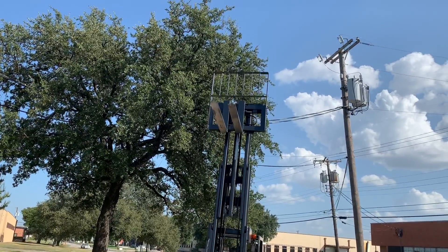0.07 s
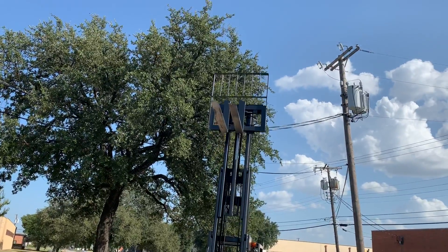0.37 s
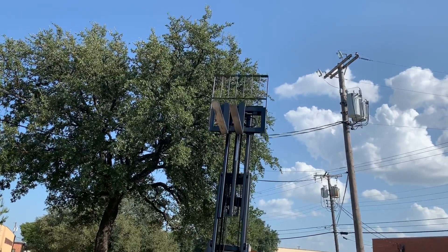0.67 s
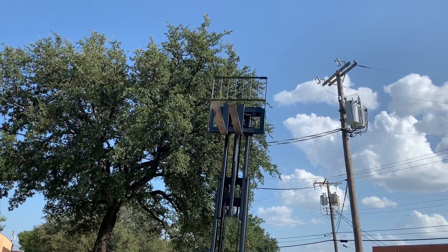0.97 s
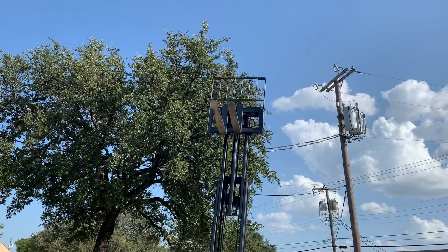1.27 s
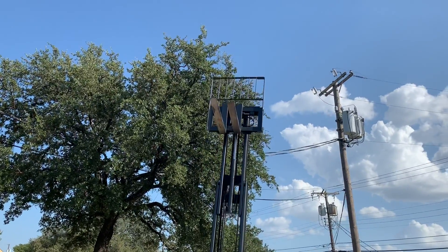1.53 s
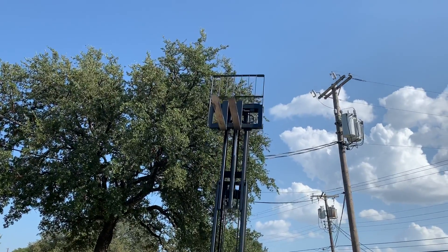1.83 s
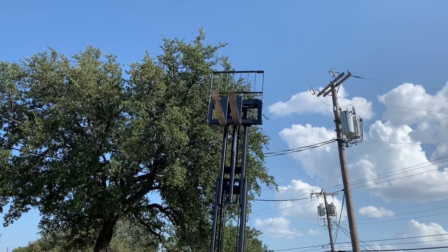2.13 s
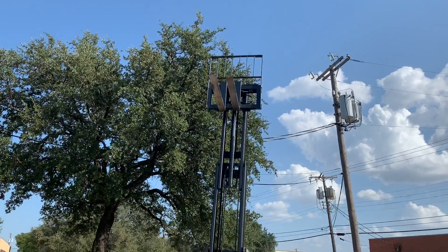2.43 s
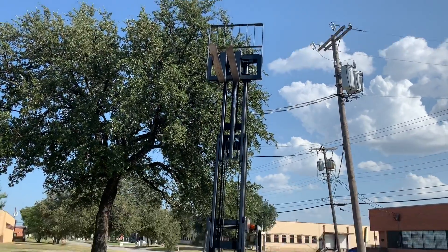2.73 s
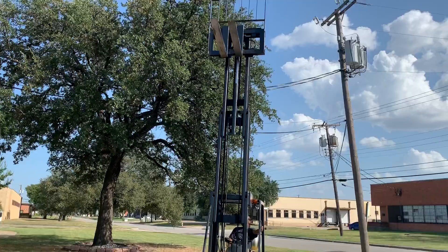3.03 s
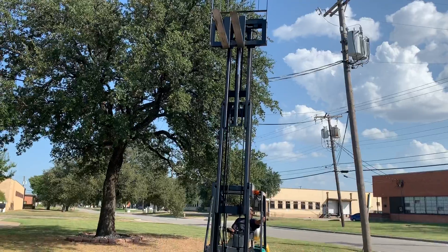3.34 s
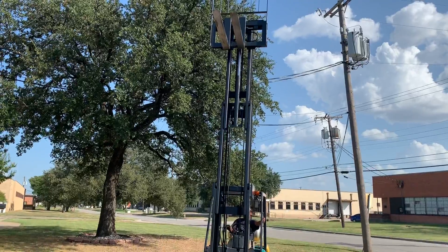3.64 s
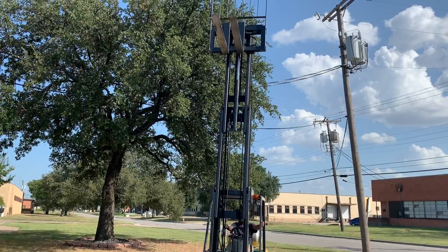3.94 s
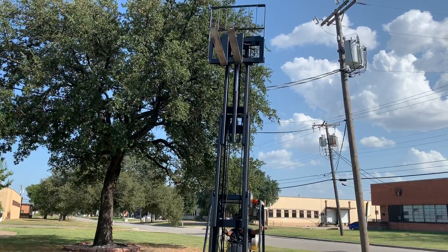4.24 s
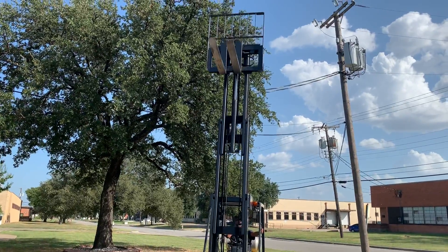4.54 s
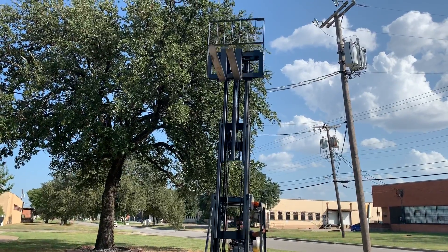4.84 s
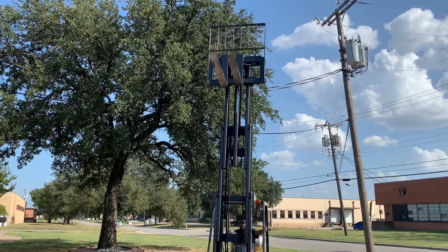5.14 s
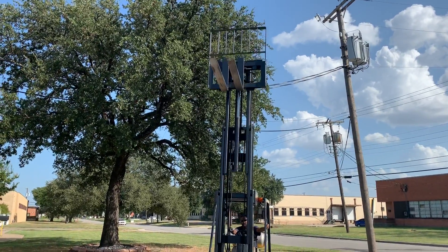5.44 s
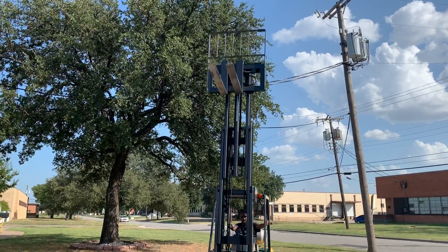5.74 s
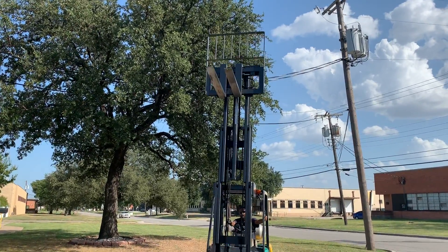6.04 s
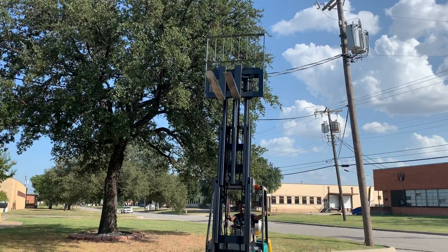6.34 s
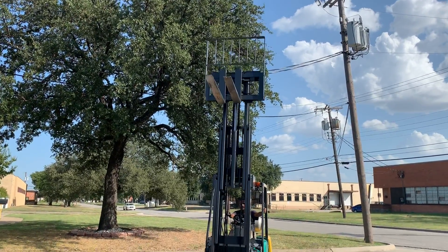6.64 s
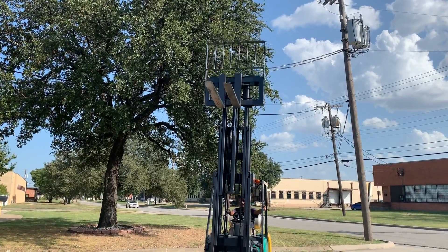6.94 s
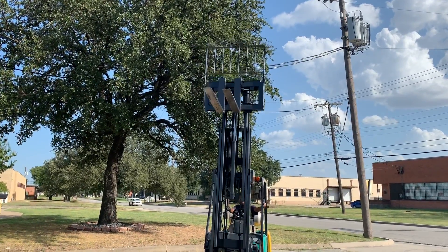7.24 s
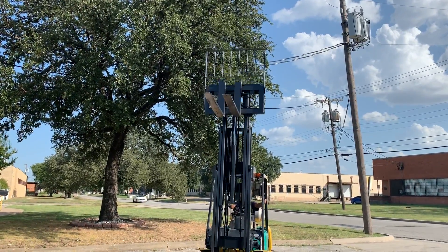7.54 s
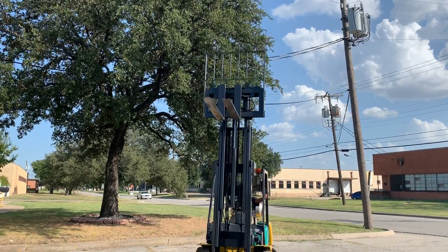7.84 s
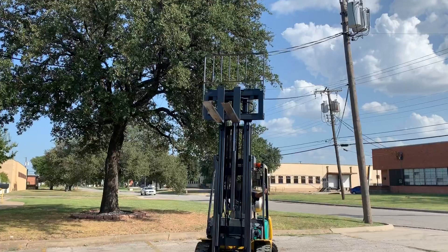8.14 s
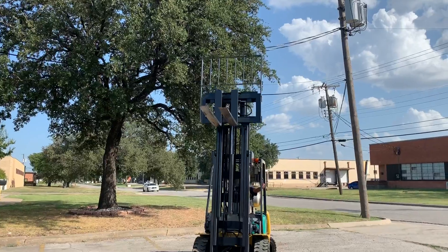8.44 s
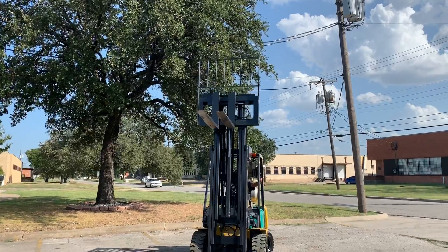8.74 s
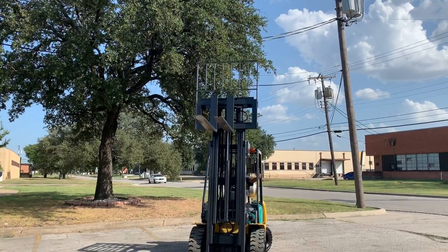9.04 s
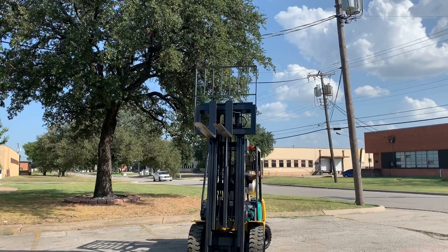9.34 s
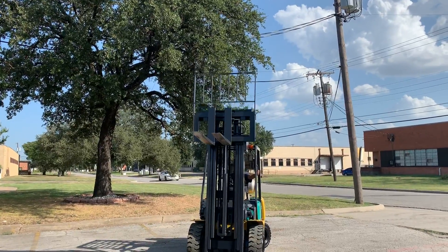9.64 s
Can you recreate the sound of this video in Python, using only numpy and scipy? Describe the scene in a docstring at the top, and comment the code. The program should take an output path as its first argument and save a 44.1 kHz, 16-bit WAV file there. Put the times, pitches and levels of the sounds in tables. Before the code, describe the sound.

The low, steady drone and lifting whine of a forklift are interrupted by a quick clatter of steel rails. The engine slows while the pump groans under load with a high whistle. After a short hiss of oil, the engine revs up and stays fast, its gears whining and the lowering cylinder ringing thinly. The place is outdoors with a faint echo from buildings, and late gusts rumble lightly on the microphone.

```python
"""A forklift's four-cylinder engine drones in a yard, with a steady whine as it lifts its carriage.
After two seconds the steel mast clatters at the top. The engine sags to idle and the pump groans
while oil whistles through a narrow valve. Then the engine speeds up and the carriage comes down,
its ram ringing thinly. Engine speed and pump strain set the level of exhaust, clatter, fan and gears.
Buildings echo faintly, and near the end gusts brush the microphone."""
import sys
import numpy as np
from scipy import signal
from scipy.fft import rfft, irfft
from scipy.io import wavfile
from scipy.ndimage import uniform_filter1d

SR = 44100
rng = np.random.default_rng(int(sys.argv[2]) if len(sys.argv) > 2 else 0)


def inscribe(sig):
    """Save sig as 16-bit PCM at rate SR to the path in sys.argv[1].

    A 1-D sig is mono; a 2-D sig holds one channel per row.
    Samples are clipped to [-1, 1] before scaling.
    """
    pcm = np.round(np.clip(np.atleast_2d(sig).T, -1, 1) * 32767)
    wavfile.write(sys.argv[1], SR, pcm.astype(np.int16))


N = 432180
T = np.arange(N) / SR
HZ = np.arange(N // 2 + 1) * SR / N


# How fast the engine runs. Each row: time in seconds, firings per second.
ENGINE_SPEED = [(0, 71.4), (1.1, 72.06), (2.17, 72.17), (2.39, 58.1), (2.5, 54.87), (2.72, 61.4),
                (3.08, 48.97), (3.38, 44.02), (3.74, 41.48), (3.96, 57.9), (4.3, 69.83), (4.6, 75.37),
                (4.95, 81.02), (5.55, 84.6), (6.5, 86.65), (7.2, 88.39), (9.8, 88.34)]

def crankshaft():
    """The spinning engine: firings so far, firings per second, and throttle from 0 to 1."""
    hz = uniform_filter1d(curves(ENGINE_SPEED)[0], int(0.061 * SR))  # the flywheel smooths changes
    speeding_up = np.clip(np.gradient(hz) * SR / 36.5, 0, 1)  # full at 36.5 Hz per second
    throttle = uniform_filter1d(speeding_up, int(0.25 * SR))
    drifting_hz = hz * (1 + 0.0012 * wander(3.973))
    stumble = 0.021 * throttle ** 2 * wander(86)  # the crank runs unevenly as it gathers speed
    return np.cumsum(drifting_hz) / SR + stumble, hz, throttle


def racing(hz):
    """0 at cruising speed and below, 1 near full speed."""
    return np.clip((hz - 73) / 13, 0, 1)


def loudness(hz, strain, cruise_db, doubling_db, racing_db, strain_db):
    """A part's level in dB: its level at 72 firings a second, changed by speed and pump strain."""
    return cruise_db + doubling_db * np.log2(hz / 72) + racing_db * racing(hz) + strain_db * strain


# The boom of the hot muffler. Each row: frequency in Hz, level in dB.
MUFFLER = [(40, -24.5), (90, -19.5), (120, -18.5), (155, -9.5), (175, -5.5), (194, 2), (215, -7),
           (245, -16.5), (320, -30.5), (600, -34.5)]
# How strongly the four cylinders fire at idle. Each entry: level in dB.
CYLINDER_DB = [0.73, -0.69, 0.8, -1.1]
# The puff of gas from each firing at idle. Each row: frequency in Hz, level in dB.
CHUG = [(50, 7.5), (110, -4), (190, -2), (260, -10), (400, -27)]

def exhaust(firings, hz, strain):
    """Firings make a low tone that breaks into uneven chugs at idle; gas booms in the muffler."""
    tone_db = loudness(hz, strain, cruise_db=-31.5, doubling_db=6, racing_db=0.46, strain_db=0.5)
    tone_db += 0.32 * wander(3.4)
    rumble_db = loudness(hz, strain, cruise_db=-20.5, doubling_db=9.5, racing_db=1.5, strain_db=0)
    rumble_db += wander(17)
    idle, fast = np.clip((62 - hz) / 12, 0, 1), racing(hz)
    count = int(firings[-1]) + 2
    firing_db = np.resize(CYLINDER_DB, count) + 1.2 * rng.standard_normal(count)
    lumps = undb(idle * np.interp(firings, np.arange(count), firing_db))
    # Each row: multiple of the firing rate, level in dB when running, level in dB at idle.
    harmonics = [(1, 0.5, -1), (2, -3.5, 8), (3, -14, 5.5), (4, -20.5, -27), (5, -22.5, -6.5)]
    tones = 0
    for multiple, run_db, idle_db in harmonics:
        level_db = tone_db + run_db + idle * (idle_db - run_db) + wander(22)
        tones += np.sqrt(2) * undb(level_db) * np.cos(2 * np.pi * multiple * firings)
    flow = noise() * throb(firings, 0.55)
    cool = colour(flow, [(f * 0.929, db) for f, db in MUFFLER])  # slow, cool gas booms lower
    boom = unit(blend(cool, colour(flow, MUFFLER), fast))
    boom /= np.sqrt(uniform_filter1d(boom ** 2, int(0.2 * SR)))  # steady flow: no chance swells
    boom *= undb(rumble_db - 2.45 + np.interp(hz, [44, 56], [-11, 0]))
    # a hum just above the second harmonic beats against it
    hum = tone(2.11 * firings, rumble_db - 7 - 10 * idle, flutter_db=3.5, wobble=0.62)
    puffs = noise() * np.exp(-(firings % 1) / 0.97)
    chugs = idle * undb(-31) * colour(puffs, CHUG)
    return lumps * (tones + chugs) + hum + boom


def knocks(firings, loose, count=120):
    """Valves and pistons knock at the same points of every four firings; loose parts add a rush."""
    offsets = 4 * (np.arange(count) + rng.random(count)) / count
    signs = rng.choice([-1, 1], count)
    cycle_starts = 4 * np.arange(count * 2)[:, None]
    at = np.interp(cycle_starts + offsets, firings, np.arange(N), right=0).ravel()
    sizes = signs * (1 + 0.63 * rng.standard_normal((len(cycle_starts), count)))
    sizes = sizes.ravel() * (at > 0)
    sample, fraction = at.astype(int), at % 1  # each click is shared between two samples
    clicks = np.bincount(sample, sizes * (1 - fraction), N + 1)
    clicks += np.bincount(sample + 1, sizes * fraction, N + 1)
    return (unit(clicks[:N]) + loose * noise()) * throb(firings, 0.033)


# The block's slow clatter, fast clatter and high rasp. Each row: frequency in Hz, level in dB.
CLATTER_SLOW = [(200, 4.5), (270, 1.5), (400, 0.5), (510, -5), (620, 1), (780, 1), (900, -2.5),
                (1020, -7.5), (1310, -1), (1470, -15), (1640, -10.5), (1760, -2.5), (1880, -15.5),
                (2050, -6.5), (2400, -9), (2800, -17), (3600, -66)]
CLATTER_FAST = [(150, -56), (270, 2), (400, 1.5), (480, -0.5), (680, 6), (850, 2), (1000, 0.5), (1300, -1),
                (1450, -6.5), (1640, 0.5), (1880, -11), (2050, -3), (2450, -5.5), (2900, -15), (3600, -54)]
RASP = [(2000, 5), (2900, 2), (3600, 0.5), (4300, 2.5), (4700, -1.5), (5150, 0), (5700, -7.5), (6500, -13),
        (7250, -4), (7900, -7.5), (8700, -6.5), (9800, -36.5), (10800, -9), (13300, -20), (15500, -19)]
# The notes the engine casing rings at. Each row: pitch in Hz, width in Hz, level in dB.
CASING = [(1152.3, 38, 9.5), (1191, 38, 2), (1257, 17, 3.5), (2014, 22, 0)]

def engine_block(firings, hz, strain):
    """Knocks in time with the crank rattle the block, ring the casing and rasp in the treble."""
    slow = colour(knocks(firings, loose=1.75), CLATTER_SLOW)
    quick = colour(knocks(firings, loose=1.34), CLATTER_FAST)
    clatter_db = loudness(hz, strain, cruise_db=-30, doubling_db=11.5, racing_db=-0.88, strain_db=3.5)
    casing_db = loudness(hz, strain, cruise_db=-35, doubling_db=5.5, racing_db=4, strain_db=0)
    rasp_db = loudness(hz, strain, cruise_db=-41.5, doubling_db=11.5, racing_db=1, strain_db=6)
    clatter = blend(slow, quick, racing(hz)) * undb(clatter_db)
    casing = ring(knocks(firings, loose=0.96), CASING) * undb(casing_db + 0.82 * wander(18))
    rasp = colour(knocks(firings, loose=1.86), RASP) * undb(rasp_db + 0.5 * wander(39))
    return clatter + casing + rasp


# The tones of the gear teeth. Each row: multiple of the firing rate, level in dB.
GEAR_TONES = [(13, -49.5), (13.39, -46.5), (13.5, -50.5), (14.5, -44), (18.87, -53), (28, -57.5)]
# The notes the gear housing rings at. Each row: pitch in Hz, width in Hz, level in dB.
HOUSING = [(836, 160, -0.5), (962, 7.1, 5.5), (1179, 82, 10), (1685, 49, 15.5), (2007, 120, 16),
           (2356, 160, 10.5)]
# The speed at which the drive twists most. Each row: firings per second, width in Hz, level in dB.
TWIST = [(84.26, 3.1, 10.5)]

def gears(firings, hz, strain):
    """Tooth tones swell as they glide past the housing's notes; all howl when the drive twists."""
    load_db = loudness(hz, strain, cruise_db=0.5, doubling_db=4, racing_db=-6, strain_db=5.5)
    slack = np.interp(hz, [55, 75], [0.9, 0.65])  # the teeth rattle more loosely at idle
    teeth = 0
    for multiple, db in GEAR_TONES:
        whine = tone(multiple * firings, db + load_db, flutter_db=2, wobble=slack)
        teeth += whine * swell(multiple * hz, HOUSING, base_db=-17)
    return teeth * swell(hz, TWIST, base_db=-3)


# The tones of the fan. Each row: multiple of the rate at which blades pass, level in dB.
FAN_TONES = [(1, -1), (2, -1), (3, -1.5), (4, -6.5), (5, -14), (6, -11), (7, -8), (8, -17), (9, -10)]
# The notes the fan's cover rings at. Each row: pitch in Hz, width in Hz, level in dB.
FAN_COVER = [(361, 9, 11), (402, 9.4, 14.5), (439.5, 3.6, 7.5), (494, 20, 12.5), (539.5, 6, 7.5),
             (600, 38, 2), (1077, 5, 2), (1350, 45, 4.5), (1559, 13.4, 10), (1620, 17, -4)]

def fan(firings, hz, strain, blades_per_firing=6.087):
    """The belt-driven fan sings; each tone swells as it passes a note of the cover."""
    fan_db = loudness(hz, strain, cruise_db=-48, doubling_db=-1.5, racing_db=3, strain_db=1.7)
    song = 0
    for multiple, db in FAN_TONES:
        ratio = multiple * blades_per_firing
        whine = tone(ratio * firings, fan_db + db, flutter_db=2.8, wobble=0.2)
        song += whine * swell(ratio * hz, FAN_COVER, base_db=-1.5)
    return song


# The pump's whine. Each row: multiple of the tooth rate, level in dB. Skipped multiples are filled in.
PUMP_TONES = [(1, -2.5), (2, 3.5), (3, -7), (4, -14), (5, -21), (6, -9), (7, -11.5), (8, -12), (9, -14),
              (14, -24), (22, -31)]
# The tones of the pump's drive. Each row: multiple of the firing rate, level in dB.
DRIVE_TONES = [(13.3, -13), (14.0, -1.5), (14.5, -9.5), (28.2, -2), (56, -13)]
# The notes of the pump's body and bracket. Each row: pitch in Hz, width in Hz, level in dB.
PUMP_BODY = [(278, 42, -9), (578, 42, 1), (648, 70, -2), (2016, 56, 8), (2340, 70, 4), (2840, 120, -2),
             (5330, 200, 0)]
BRACKET = [(623, 25, 5), (686, 45, -5), (1183, 60, -1), (2880, 110, -4)]
# Oil pressure. Each row: time in seconds, pressure (near 1 when the relief valve blows).
PRESSURE = [(2.1, 0.26), (2.2, 1.5), (2.38, 0.21), (2.48, 1), (2.55, 0.13), (2.76, 0), (2.88, 0.97),
            (3.08, 0.96), (3.21, 1.28), (3.45, 0.98), (3.6, 1.1), (3.71, 0.94), (3.76, 0.044)]

def pump(firings, hz, strain, teeth_per_firing=6.087):
    """Under pressure the pump's teeth groan, its drive shakes the bracket and oil rings its body."""
    pump_db = loudness(hz, strain, cruise_db=-32.5, doubling_db=7, racing_db=-1.5, strain_db=-2.5)
    tooth_phase = 2 * np.pi * (teeth_per_firing * firings + 0.02 * wander(60))
    multiples, levels_db = np.transpose(PUMP_TONES)
    whine = drive = 0
    for k in range(1, round(multiples[-1]) + 1):
        gain = undb(np.interp(k, multiples, levels_db))
        gain *= swell(k * teeth_per_firing * hz, PUMP_BODY, base_db=-6)
        whine += gain * np.sin(k * tooth_phase + k * k)  # k * k keeps the peaks from lining up
    whine *= np.sqrt(2) * undb(pump_db + 2 * wander(59))
    for multiple, db in DRIVE_TONES:
        shake = tone(multiple * firings, pump_db + db, flutter_db=2.5, wobble=0.7)
        drive += shake * swell(multiple * hz, BRACKET, base_db=-14)
    rush = ring(knocks(firings, loose=1.2), PUMP_BODY) * undb(pump_db - 11.5)
    return curves(PRESSURE)[0] * (whine + drive + rush) * throb(firings, 0.35)


# Blows of rail on rail. Each row: start in seconds, level in dB, seconds to fade by 60 dB.
BLOWS = [(2.096, -16.5, 0.15), (2.117, -25, .1), (2.146, -26, 0.09), (2.194, -20, 0.22),
         (2.219, -14.5, 0.2), (2.227, -13, .2), (2.259, -21, 0.26), (2.284, -22.5, .18), (2.301, -24.5, .1),
         (2.36, -16.5, 0.13), (2.457, -25, .08)]
# The crash of the steel rails. Each row: frequency in Hz, level in dB.
RAIL_CRASH = [(180, -42), (320, -4), (600, -6), (930, 1.5), (1110, -7), (1600, -1), (1970, -7), (2500, -12),
              (3250, -15), (4300, -18), (5800, -33), (7000, -22.5), (8740, -31), (9800, -66), (10600, -36),
              (15000, -48)]
# The notes the rails ring at. Each row: pitch in Hz, width in Hz, level in dB.
RAIL_NOTES = [(706, 27, 3), (1004, 24, -0.5), (1434, 18, 1), (1587, 30, 1.5), (1860, 17, -0.5),
              (2010, 18, 2), (2400, 30, -5)]
# Snaps of the lift chain. Each row: start in seconds, level in dB.
CHAIN_SNAPS = [(2.114, -27), (2.152, -22.5), (2.17, -23)]

def mast():
    """The rails knock together, crash and ring; the lift chain snaps taut."""
    power = 0
    for start, db, fade_s in BLOWS:
        hard_contact = burst(start, db - 7, fade_s=0.025)
        power += burst(start, db, fade_s) ** 2 + hard_contact ** 2
    steel = 0.5 * (colour(noise(), RAIL_CRASH) + ring(noise(), RAIL_NOTES))
    steel *= undb(0.65 * wander(230))
    snaps = sum(burst(start, db + 1.5, fade_s=0.032) for start, db in CHAIN_SNAPS)
    snaps = uniform_filter1d(snaps, SR // 300)  # links take the load in turn, softening each snap
    chain = colour(noise(), [(2000, 13), (6000, 1), (12000, 5), (15500, 2)])
    return np.sqrt(power) * steel + snaps * chain


# Valve openings. Each row: start, end and rise time in seconds, then the levels in dB
# of oil hiss, whistle and ram hiss, then the strain on the pump from 0 to 1.
OPENINGS = [(0, 2, 0.0047, -88, -90, -48, 0), (2.09, 2.505, .08, -53, -55, -54, .9),
            (2.68, 3.715, .1, -64.5, -51.5, -70, 1), (3.92, 4.015, .03, -44.5, -58, -66, 0),
            (4.2, 11, 2.5, -62.5, -78, -67, 0.14)]
# Spurts of oil as the valve moves. Each row: start in seconds, oil hiss in dB, ram hiss in dB.
SPURTS = [(2.48, -69, -74), (2.755, -63, -49), (3.71, -52, -62)]

def valve():
    """The valve opens and shuts: gives the gains of hiss, whistle and ram, and the pump strain."""
    ease = int(0.023 * SR)  # the valve cannot jump
    hiss = whistle = ram = strain = 0
    for start, end, rise, hiss_db, whistle_db, ram_db, load in OPENINGS:
        opening = uniform_filter1d(gate(start, end, rise, fall=0.05), ease)
        hiss += opening * undb(hiss_db)
        whistle += opening * undb(whistle_db)
        ram += opening * undb(ram_db)
        strain += opening * load
    for start, hiss_db, ram_db in SPURTS:
        spurt = uniform_filter1d(burst(start, 0, fade_s=0.14), ease)
        hiss += spurt * undb(hiss_db)
        ram += spurt * undb(ram_db)
    return hiss, whistle, ram, strain


# The hiss of rushing oil. Each row: frequency in Hz, level in dB.
OIL_HISS = [(3000, 13), (6000, 13), (8500, -8), (11500, 20), (13300, 7), (15500, -9)]
# The ram's hiss and the valve's whistle. Each row: pitch in Hz, width in Hz, level in dB.
RAM_HISS = [(5044, 76, 6), (7150, 180, 0)]
WHISTLE = [(12200, 90, 3), (15287, 843, 3)]

def oil_flow(hiss_gain, whistle_gain, ram_gain):
    """The ram (the lifting piston) hisses; oil rushes through the valve, whistling if it is narrow."""
    ram = ram_gain * ring(noise(), RAM_HISS) * undb(0.76 * wander(23))
    hiss = hiss_gain * colour(noise(), OIL_HISS) * undb(1.7 * wander(44))
    whistle = whistle_gain * ring(noise(), WHISTLE) * undb(1.3 * wander(30))
    return ram + hiss + whistle


# The whine of lifting. Each row: multiple of the firing rate, level in dB.
LIFT_TONES = [(4.5, -44), (5.47, -47), (11.5, -44.5), (12.174, -44), (12.47, -43), (18.24, -48),
              (24.3, -53), (27.95, -51), (29, -53), (30.4, -51)]

def lift_drive(firings, end_s=2.15, fade_s=0.25):
    """The loaded drive sings a steady chord until the mast reaches its stop."""
    chord = sum(tone(multiple * firings, db - 2.5, flutter_db=2.5, wobble=0.32)
                for multiple, db in LIFT_TONES)
    return chord * np.clip(1 - (T - end_s) / fade_s, 0, 1)


# Engine tones that reach the hood. Each row: multiple of the firing rate, level in dB.
HOOD_TONES = [(4, -41), (7.5, -42)]
# The notes the hood panels ring at. Each row: pitch in Hz, width in Hz, level in dB.
HOOD_PANELS = [(342, 11, -2.5), (643, 9, 7)]

def hood(firings, hz):
    """The hood panels hum when an engine tone passes one of their own notes."""
    return sum(tone(multiple * firings, db, flutter_db=1, wobble=0.26)
               * swell(multiple * hz, HOOD_PANELS, base_db=-14.5) for multiple, db in HOOD_TONES)


# The notes of the ram sliding in. Each row: pitch in Hz, width in Hz, level in dB.
SLIDE_NOTES = [(3240, 14, 0), (3685, 28.1, 3), (3970, 18, -4), (4300, 22, -6), (4570, 18, -6),
               (4870, 14, 3), (5160, 54, 1), (7130, 45, -3), (7550, 43, -2), (8000, 15.97, -4)]

def sliding_ram(start_s=4, rise_s=1):
    """The steel cylinder gives a thin metallic ring while the carriage comes down."""
    sliding = np.clip((T - start_s) / rise_s, 0, 1)
    return sliding * ring(noise(), SLIDE_NOTES) * undb(-47.5 + 1.5 * wander(10))


# Roller squeaks. Each row: start in seconds, length in seconds, pitch in Hz, level in dB.
SQUEAKS = [(4.37, 0.032, 2005, -34), (8.227, 0.0089, 2092, -25.5)]

def rollers():
    """The carriage rollers catch and squeak briefly in the rails."""
    return sum(gate(start, start + length, rise=0.0091, fall=0.0092)
               * tone(hz * T, db, flutter_db=4.5, wobble=0.4) for start, length, hz, db in SQUEAKS)


# Gusts of wind. Each row: start, end and build-up time in seconds, level in dB.
GUSTS = [(6.4, 7.9, 1.2, -34), (9.19, 9.73, 0.1, -22.5), (9.44, 9.7, 0.2, -28)]
# The rumble of wind on the microphone. Each row: frequency in Hz, level in dB.
WIND_RUMBLE = [(12, 6), (28, -8), (60, 6), (100, -1), (200, -8.5), (500, -23.5), (1500, -70)]

def wind():
    """Gusts buffet both microphone openings alike; a light breeze flutters differently at each."""
    gust = sum(undb(db) * gate(start, end, rise, fall=0.22) for start, end, rise, db in GUSTS)
    gust *= undb(2 * wander(14))  # quick buffets
    flutter = 0.2 * gust + undb(-51.5 + 2.5 * wander(5.6))
    middle = gust * colour(noise(), WIND_RUMBLE)
    side = flutter * colour(noise(), WIND_RUMBLE)
    return np.array([middle + side, middle - side])


# Which side is louder. Each row: frequency in Hz, left minus right in dB.
STEREO_BALANCE = [(60, -1.3), (110, 0.6), (200, 0), (380, -1.5), (700, 0.2), (1290, 0), (2380, 3),
                  (4400, -2.5), (8120, -0.5), (15000, -1)]
# Which side hears it first. Each row: frequency in Hz, the left side's lead in radians.
STEREO_LEAD = [(100, 0.026), (400, -0.027), (550, -0.2), (1100, -0.058), (1600, -.42), (2100, -0.57),
               (2700, 0.66), (4000, 0.16), (5000, 0.012), (5900, -.9), (6800, .5), (7500, -0.076),
               (15000, 0)]
# Stereo width of the treble: narrow high bands that sound spread out between left and right.
# Each row: frequency in Hz, level of the spread-out part in dB compared with the middle.
TREBLE_WIDTH = [(1000, -56), (3000, -17), (4400, -37), (5200, -6.5), (6400, 2.5), (7200, -8), (8000, -24),
                (8700, 2.5), (9800, 22.5), (10700, 8.5), (11500, -27), (12500, -12), (13400, 12),
                (14500, -11), (15500, -20)]

def yard(x, echo_db, fade_s):
    """Sound reaches left and right slightly apart, some high bands sound wide and buildings echo."""
    def tail(delay, decay):
        response = noise() * burst(delay, 0, decay) * (T < delay + decay)
        return rfft(response / np.sqrt(np.sum(response ** 2)))
    balance = np.tanh(across(STEREO_BALANCE) * np.log(10) / 40)
    lead = 1j * np.tan(across(STEREO_LEAD) / 2)
    width = tail(delay=0, decay=0.039) * undb(across(TREBLE_WIDTH))
    echo_colour = across([(90, -33), (190, -18), (380, -29), (600, -11.5), (1000, -5), (2000, 3),
                          (4000, 1.5), (8000, -10)])
    echo = tail(delay=0.027, decay=fade_s) * undb(echo_db + echo_colour)
    side = irfft(rfft(x) * (balance + lead + width + echo), N)
    return np.array([x + side, x - side])


def undb(db):
    """Turn decibels into a gain to multiply by."""
    return 10 ** (np.asarray(db) / 20)


def unit(x):
    """Scale a signal to an average power of 1."""
    return x / np.sqrt(np.mean(x ** 2))


def noise():
    """White noise, an even hiss."""
    return rng.standard_normal(N)


def wander(rate_hz):
    """A smooth random drift, about 1 in size."""
    width = int(SR / rate_hz)
    smoothed = uniform_filter1d(noise(), width, mode="wrap")
    return unit(uniform_filter1d(smoothed, width, mode="wrap"))


def curves(table):
    """Join the rows of a timed table into one curve for each column of values."""
    times, *columns = np.transpose(table)
    return [np.interp(T, times, column) for column in columns]


def across(points):
    """Join rows of frequency and value into a curve over all pitches."""
    hz, value = np.transpose(points)
    return np.interp(np.log(HZ + 1), np.log(hz), value)


def colour(x, points):
    """Shape a sound's lows and highs, rolling off beyond the table's ends; power 1."""
    low_cut = 1 + (points[0][0] / (HZ + 1) / 2) ** 4
    high_cut = 1 + (HZ / points[-1][0] / 2) ** 4
    return unit(irfft(rfft(x) * undb(across(points)) / (low_cut * high_cut), N))


def ring(x, notes):
    """Let a sound ring an object at its own notes (its resonances); power 1."""
    response = sum(undb(db) / (1 + 1j * (HZ - hz ** 2 / (HZ + 1)) / (2 * width)) ** 2
                   for hz, width, db in notes)
    return unit(irfft(rfft(x) * response, N))


def swell(hz, notes, base_db):
    """The gain of a gliding tone, which rises near each of an object's own notes."""
    grid = np.linspace(hz.min(), hz.max(), SR // 100)
    peaks = sum(undb(db) / (1 + ((grid - centre) / width) ** 2) ** 2 for centre, width, db in notes)
    return np.interp(hz, grid, undb(base_db) + peaks)


def tone(cycles, db, flutter_db, wobble):
    """A machine tone that wavers in level and in phase (wobble, in radians)."""
    gain = np.sqrt(2) * undb(db + flutter_db * wander(20.4))
    return gain * np.sin(2 * np.pi * cycles + wobble * wander(18.4))


def throb(firings, depth):
    """A gain that pulses once with every firing."""
    return 1 + depth * np.cos(2 * np.pi * firings)


def blend(first, second, share):
    """Fade from the first sound to the second as share goes from 0 to 1."""
    return np.sqrt(1 - share) * first + np.sqrt(share) * second


def burst(start, db, fade_s):
    """The loudness of a blow: a quick rise, then a fall of 60 dB in fade_s seconds."""
    age = np.maximum(T - start, 0)
    return undb(db - 60 * np.minimum(age / fade_s, 2)) * (1 - np.exp(-age / 0.00027))


def gate(start, end, rise, fall):
    """A gain that rises, holds and falls away; all times in seconds."""
    return np.clip((T - start) / rise, 0, 1) * np.clip(1 - (T - end) / fall, 0, 1)


def scene():
    """The whole forklift, the yard and the wind."""
    firings, hz, throttle = crankshaft()
    hiss, whistle, ram, strain = valve()
    engine = sum(part(firings, hz, strain) for part in (exhaust, engine_block, fan, gears))
    engine += hood(firings, hz) + lift_drive(firings) + pump(firings, hz, strain)
    engine *= undb(1.06 * throttle)  # a little louder while gathering speed
    forklift = engine + mast() + oil_flow(hiss, whistle, ram) + sliding_ram() + rollers()
    return yard(forklift, echo_db=-16, fade_s=0.54) + wind()


def record(dry, fade_s=0.004, top_hz=15800):
    """The sound starts and ends without a click; the phone cuts the highest treble."""
    faded = dry * gate(0, T[-1] - fade_s, fade_s, fade_s)
    return signal.sosfilt(signal.ellip(14, 0.2, 90, top_hz, fs=SR, output="sos"), faded)


dry = scene()
out = record(dry)
inscribe(out)
```